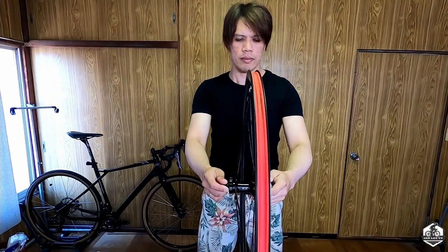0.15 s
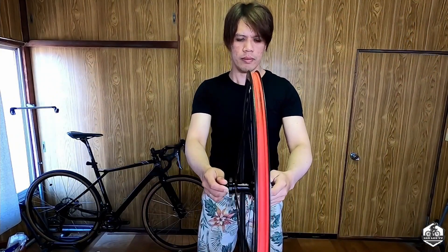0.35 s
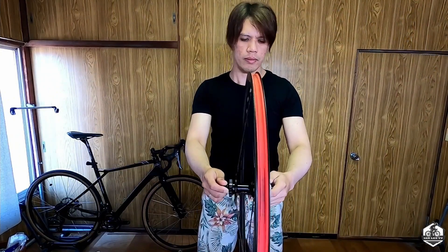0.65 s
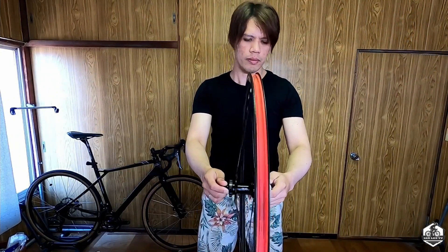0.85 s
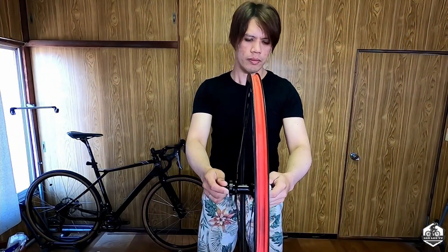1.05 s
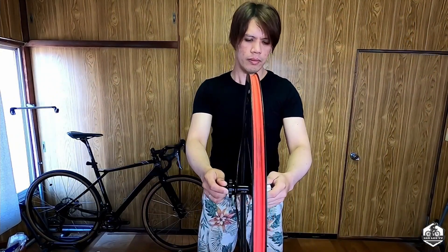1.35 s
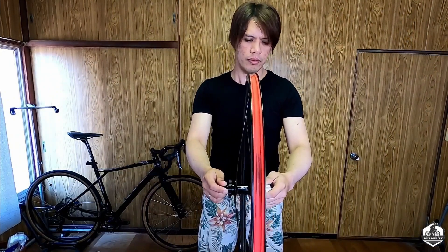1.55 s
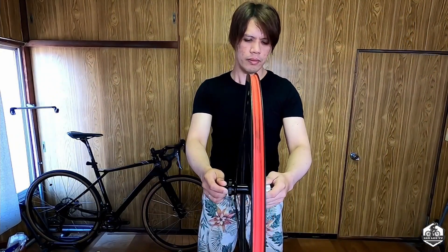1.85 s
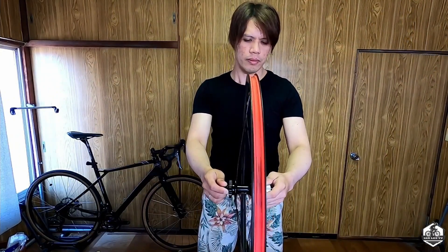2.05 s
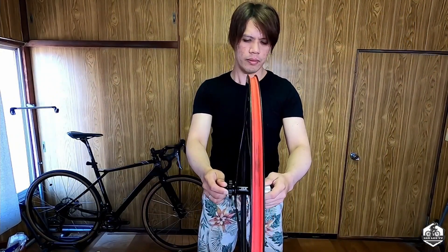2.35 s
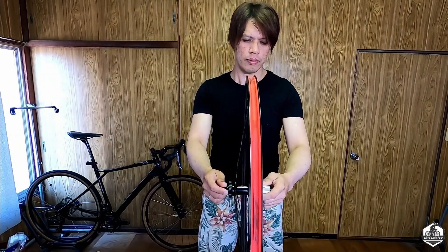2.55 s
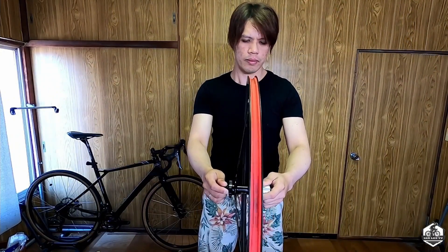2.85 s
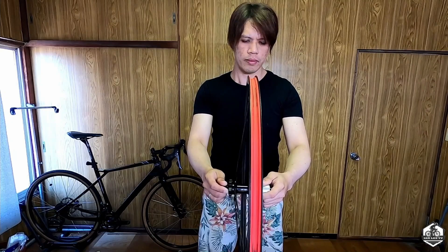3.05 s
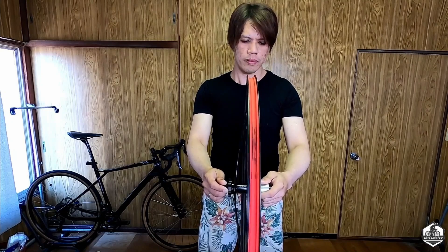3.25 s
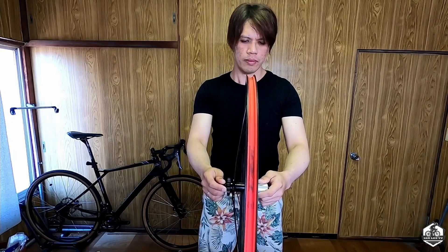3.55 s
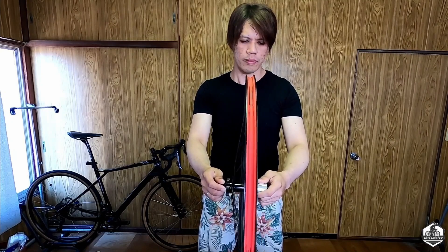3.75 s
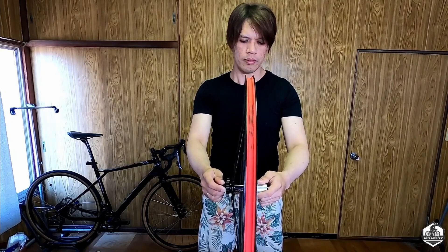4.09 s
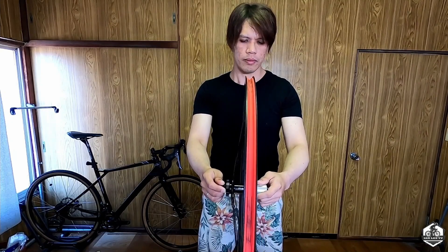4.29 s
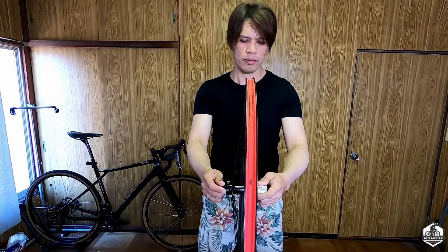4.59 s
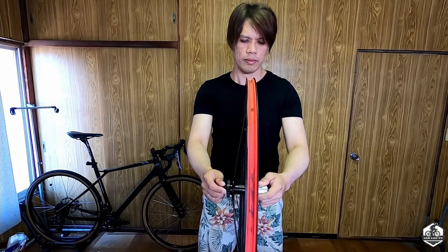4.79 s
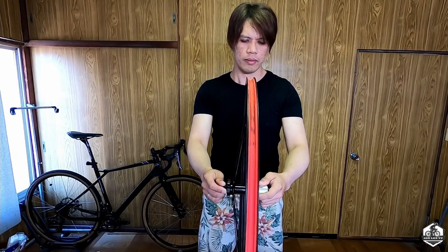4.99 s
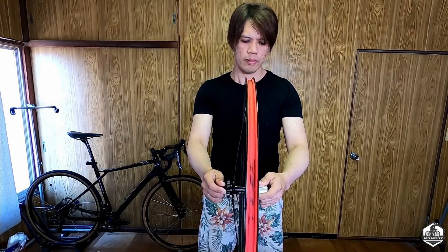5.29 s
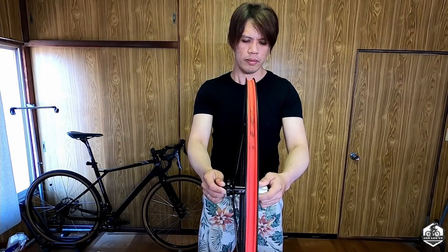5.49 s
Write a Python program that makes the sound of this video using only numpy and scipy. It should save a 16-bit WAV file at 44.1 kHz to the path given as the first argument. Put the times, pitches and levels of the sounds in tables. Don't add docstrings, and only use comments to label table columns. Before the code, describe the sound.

A hand-spun bicycle wheel's freewheel buzzes loudly and close in a small room, slowing from a metallic whirr to a rattle of separate clicks.

```python
import sys
import numpy as np
from scipy import signal
from scipy.fft import rfft, irfft, next_fast_len
from scipy.io import wavfile
from scipy.ndimage import uniform_filter1d

SR = 44100
rng = np.random.default_rng(int(sys.argv[2]) if len(sys.argv) > 2 else 0)


def dump(signal):
    limited = np.clip(np.atleast_2d(signal).T, -1, 1)
    pcm = np.round(limited * 32767).astype(np.int16)
    wavfile.write(sys.argv[1], SR, pcm)


def makeup_ratio(level_db):
    decades = np.asarray(level_db, float) / 20
    return 10 ** decades


N = 248272
RING, BEFORE = 6144, 12000


def read(points, hz):
    f, value = np.transpose(points)
    return np.interp(np.log(hz + 1), np.log(f + 1), value)


def coloured(x, points):
    size = next_fast_len(x.shape[-1])
    gain = makeup_ratio(read(points, np.fft.rfftfreq(size, 1 / SR)))
    return irfft(rfft(x, size) * gain, size)[..., :x.shape[-1]]


def evened(x):
    return x / np.sqrt(np.mean(x ** 2) + 1e-20)


def dying(x, t60):
    hz, t, z = signal.stft(x, SR, nperseg=128)
    decay = np.exp(-np.log(1000) * t / read(t60, hz)[:, None])
    return signal.istft(z * decay, SR, nperseg=128)[1]


# t/s, lateness/ms
AXLE_ROCK = [(0.0, -0.42), (0.6, 0.2), (1.3, -0.47), (2.1, 0.34), (2.75, -0.57), (3.0, -2.3), (3.3, -0.58),
             (3.5, 1.64), (3.7, -0.44), (4.0, 0.05), (4.3, -1.89), (4.7, -1.01), (5.0, 0.66), (5.25, 1.54),
             (5.63, -6.85)]
# t/s, extra level/dB
HARD_BLOWS = [(0.092, 1), (0.378, 3.5), (0.427, -0.5), (0.597, 2.5), (0.683, 5), (0.894, 3.5), (0.948, 2.5),
              (1.108, 1.5), (1.197, 2.5), (1.746, 1.5), (1.787, 2.5), (2.399, 2), (2.669, 2.5),
              (2.694, 3.5), (2.715, 2.5), (3.305, 2), (3.361, 3), (3.39, 1.5), (3.656, 2.7), (3.816, 3.5),
              (3.883, 4), (4.089, 2.5), (4.229, 4), (4.442, 2.5), (4.659, 2), (4.767, 3.5), (4.878, 4.5),
              (5.108, 2.5), (5.227, 4), (5.438, 3.5)]
# t/s, extra level/dB
MORE_BLOWS = [(0.648, -4.8), (0.787, -3.6), (0.984, 0), (1.001, -4), (1.125, -4), (1.143, -2),
              (1.435, 0), (1.529, 0), (1.955, -1), (1.976, 0), (2.065, 0.5), (3.121, 1), (3.173, -1),
              (3.277, 1), (3.625, -3), (3.917, -2), (3.985, -1.5), (4.37, -0.5), (4.585, -1),
              (4.622, -3.0), (5.068, -3), (5.187, -1.5), (5.393, -3.5), (5.527, 0.5)]


def teeth():
    teeth_per_turn, pawl_pitch = 72, 12
    k = np.arange(-12, 233)
    energy = 64.22 ** 2 - 16.65 * k + .00064 * k ** 2
    imbalance = 163 * np.cos(2 * np.pi * (k - 4.4) / teeth_per_turn)
    gap = 1 / np.sqrt(energy + imbalance)
    s = np.cumsum(gap) - gap / 2
    s = s - s[k == 0] + .016
    chance = rng.standard_normal((len(k), 2))
    s = s + np.interp(s, *np.transpose(AXLE_ROCK)) / 1000 + .0004 * chance[:, 0]
    blow_db = 1.54 * chance[:, 1]
    for at, db in HARD_BLOWS + MORE_BLOWS:
        blow_db[np.argmin(abs(s - at))] = db
    swell_db = 0.24 * np.cos(2 * np.pi * (k - 54) / teeth_per_turn)
    swell_db += 0.42 * np.cos(2 * np.pi * (k - 8) / pawl_pitch)
    return s, blow_db + swell_db


RISE_S = 0.00086

MODE_HZ = [1060, 1150, 1360, 1450, 1785, 2131, 2169, 2337, 2367, 2420, 2577, 2769, 2900, 2961, 3106, 3273,
           3385, 3635, 4024, 4220, 4740, 4940, 5590, 6030, 7147, 7359, 7895, 8760, 9352]
# width/Hz, level/dB
MODE_RING = [(30, -31.5), (30, -31.5), (25.2, -24), (34.5, -20), (30.2, -17), (15.7, -14.5), (21.5, -13.5),
             (15.9, -12.5), (15.9, -12.5), (20, -17), (25, -20.5), (40, -17.5), (21.4, -12.5), (15.9, -14),
             (49.7, -20), (20, -13.5), (20, -26), (76, -3.5), (40, -14), (80, -4.5), (89.5, -8.5),
             (30, -19), (122, -3.5), (140, -6), (60, -2), (90, -13), (70, -13), (199, 2), (109, 1.5)]


def ringing_modes(extra_db, t):
    f, (width, db) = np.array(MODE_HZ), np.transpose(MODE_RING)
    shape = (len(extra_db), len(f))
    share = makeup_ratio(2 * rng.standard_normal(shape)) * np.exp(2j * np.pi * rng.random(shape))
    share *= makeup_ratio(2.13 * np.outer(extra_db, f > 8200))
    size = makeup_ratio(db) * np.sqrt(width)
    rings = size[:, None] * np.exp((2j * f - width)[:, None] * np.pi * t)
    return rfft((share @ rings).real * (1 - np.exp(-t / RISE_S)))


# f/Hz, level/dB per Hz
DENSE_LEVEL = [(500, -42.5), (1200, -34.5), (1800, -17.5), (2500, -15.5), (4500, -9.5), (6500, -6),
               (9000, -1.5), (10000, -6), (10600, -14), (11100, -19), (12500, -21.5), (14000, -16.5),
               (15500, -29), (17000, -44)]
# f/Hz, T60/s
DENSE_DECAY = [(1000, 0.44), (3000, 0.069), (6000, 0.12), (9000, 0.052), (13000, 0.027)]


def dense_ring(count, hz):
    dense = rfft(dying(rng.standard_normal((count, RING)), DENSE_DECAY)[:, :RING])
    smooth = np.sqrt(uniform_filter1d(abs(dense) ** 2, size=24))
    return dense * makeup_ratio(read(DENSE_LEVEL, hz)) / smooth


def three_pawls(modes, dense, t, hz):
    count = len(modes)
    lag = .003 * rng.random((count, 3)) * [0, 1, 1]
    size = makeup_ratio(1.5 * rng.standard_normal((count, 3)) - 0.5 * np.array([0, 1, 1]))
    comb, landed = 0, 0
    for k in range(3):
        late, strength = lag[:, [k]], size[:, [k]]
        comb = comb + strength * np.exp(-2j * np.pi * hz * late)
        landed = landed + strength ** 2 * (1 - np.exp(-np.maximum(t - late, 0) / RISE_S))
    modes = modes * comb
    dense = rfft(irfft(dense, RING) * np.sqrt(landed) * (t < t[-1] / 2))
    both = makeup_ratio(-4) * modes / np.linalg.norm(modes) + dense / np.linalg.norm(dense)
    return both / np.linalg.norm(both)


def steel_tick(count, t, hz):
    tick = rfft(rng.standard_normal((count, RING)) * np.exp(-np.log(1000) * t / .015))
    tick *= makeup_ratio(read(DENSE_LEVEL, hz)) / (1 + (11300 / (hz + 1)) ** 10)
    return makeup_ratio(-19) * tick / np.linalg.norm(tick)


# f/Hz, width/Hz, level/dB
MODE_DIPS = [(1230, 80, -6), (3460, 90, -5), (4400, 150, -6), (4820, 40, -7), (5830, 70, -3),
             (6140, 90, -7), (7260, 50, -4)]


def on_the_way(click, hz):
    wall_s = .0135 + 0.000595 * rng.standard_normal((len(click), 1))
    click = click * (1 + makeup_ratio(-12.5) * np.exp(-2j * np.pi * hz * wall_s))
    click *= makeup_ratio(sum(db / (1 + (2 * (hz - at_hz) / wide) ** 2) for at_hz, wide, db in MODE_DIPS))
    chance = uniform_filter1d(rng.standard_normal(click.shape), size=150)
    return click * makeup_ratio(1.56 * evened(chance))


def struck(click, blow_db, extra_db, t, hz):
    rim, tick = np.clip((7500 - hz) / 2500, 0, 1), np.clip((hz - 10500) / 1000, 0, 1)
    for part in (rim, 1 - rim - tick, tick):
        energy = (part * abs(click) ** 2).sum(1, keepdims=True)
        click = click * (energy.mean() / energy) ** (part / 2)
    rim_db = (0.46 - 1) * extra_db
    tick_db = (0.13 - 1) * extra_db + 0.5 * rng.standard_normal(len(blow_db))
    colour_db = np.outer(rim_db, rim) + np.outer(tick_db, tick) + blow_db[:, None]
    clicks = irfft(click * makeup_ratio(colour_db), RING)
    return clicks * makeup_ratio(-0.52 * np.outer(extra_db, 1 - np.exp(-(t / 0.0051) ** 2)))


# f/Hz, level/dB
MICROPHONE = [(250, -6), (500, 1.5), (1500, -4.5), (15700, 3), (16100, -19), (17000, -24)]


def wheel():
    s, blow_db = teeth()
    t, hz = np.arange(RING) / SR, np.fft.rfftfreq(RING, 1 / SR)
    extra_db = blow_db - uniform_filter1d(blow_db, size=25)
    modes = ringing_modes(extra_db, t)
    dense = dense_ring(len(s), hz)
    ring = three_pawls(modes, dense, t, hz)
    click = on_the_way(ring + steel_tick(len(s), t, hz), hz)
    clicks = struck(click, blow_db, extra_db, t, hz)
    out = np.zeros(BEFORE + N + RING)
    for at, one in zip(np.round(s * SR).astype(int) + BEFORE, clicks):
        out[at:at + RING] += one
    return makeup_ratio(-22.5) * evened(coloured(out[:BEFORE + N], MICROPHONE))


# f/Hz, T60/s
WALLS_DECAY = [(500, 0.86), (2000, 0.76), (5000, 0.29), (9000, 0.14), (14000, 0.21)]


def walls(x):
    turn = np.pi * np.arange(len(x)) / SR * 2.7
    out = np.zeros((2, len(x)))
    at = np.arange(240, SR // 3, 20)
    for sway in (np.cos(turn), np.sin(turn)):
        taps = np.zeros((2, SR // 3 + 20))
        place = at + rng.integers(0, 20, (2, len(at)))
        sign = rng.choice([-1., 1.], (2, len(at)))
        np.put_along_axis(taps, place, sign, 1)
        tail = dying(taps, WALLS_DECAY)
        tail /= np.linalg.norm(tail[0])
        out += signal.fftconvolve((x * sway)[None], tail, axes=1)[:, :len(x)]
    return out


# f/Hz, level/dB per Hz
HOUSE_HUM = [(8, -4), (25, -9.5), (33, -20), (44, -10.5), (147, -28.5), (195, -27), (220, -17),
             (245, -25.5), (270, -24), (327, -31.5), (490, -30.5), (914, -37.5), (2000, -37), (16000, -59)]
# middle t/s, length/s, level/dB, pitch f/Hz
PRESSURE_SWELLS = [
    (0.187, 0.26, -42, 18),
    (0.542, .35, -41, 17),
    (0.98, 0.89, -37.5, 18.2),
    (1.56, 0.32, -47, 15),
    (2.25, 0.95, -42, 15.5),
    (2.733, 0.32, -42, 18),
    (3.304, 2.6, -41.5, 15.5),
    (4.236, 0.73, -33, 14.3),
    (4.852, 0.94, -35.5, 16.8),
    (5.526, 0.26, -38.5, 16),
]


def hum():
    noise = coloured(rng.standard_normal((2, N)), HOUSE_HUM)
    t = np.arange(N) / SR
    wobble = np.zeros(N)
    for s, length, db, hz in PRESSURE_SWELLS:
        bell = np.cos(np.pi * np.clip((t - s) / length, -.5, .5)) ** 2
        wobble += np.sqrt(2) * makeup_ratio(db) * bell * np.sin(2 * np.pi * hz * t)
    return makeup_ratio(-45.5) * evened(noise) + wobble * [[1], [0]]


# f/Hz, level/dB
PAIR_SIDE = [(25, -14), (125, -9.5), (500, -14), (1500, -12.5), (3000, -15.5), (8000, -17.5), (13000, -7.5)]


def scene():
    near = wheel()
    echo, room = walls(near)[:, BEFORE:], hum()
    mid = near[BEFORE:] + makeup_ratio(-3) * echo[0] + room[0]
    side = coloured(echo[1] + room[1], PAIR_SIDE)
    return np.array([mid + side, mid - side])


def roll_off(x):
    return signal.sosfilt(signal.butter(12, 16800, fs=SR, output="sos"), x)


# t/s, length/s, side level/dB
SIDES_APART = [(0.381, 0.3, -25.5), (1.15, 0.029, -25), (1.798, 0.067, -25.0), (2.264, 0.15, -23.5),
               (2.898, 0.19, -25), (3.583, 0.071, -24), (3.795, 0.024, -24.0), (3.886, 0.022, -25),
               (3.949, 0.017, -22), (4.222, 0.059, -24), (4.323, 0.046, -23), (4.987, 0.01, -26),
               (5.102, 0.029, -21), (5.227, 0.0058, -16), (5.286, 0.081, -24)]


def record(dry):
    mid, side = dry.mean(0), (dry[0] - dry[1]) / 2
    side_db = np.full(N, -37.5)
    for s, length, db in SIDES_APART:
        side_db[round(s * SR):round((s + length) * SR)] = db
    side = side * uniform_filter1d(makeup_ratio(side_db + 21), size=200)
    return roll_off(np.array([mid + side, mid - side]))


dry = scene()
out = record(dry)
dump(out)
```